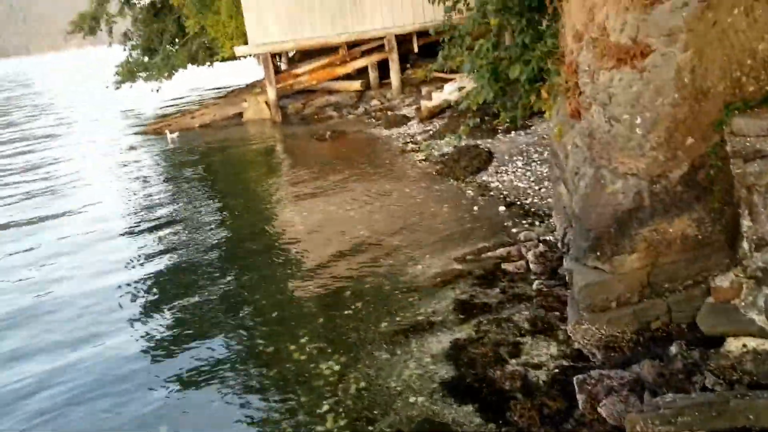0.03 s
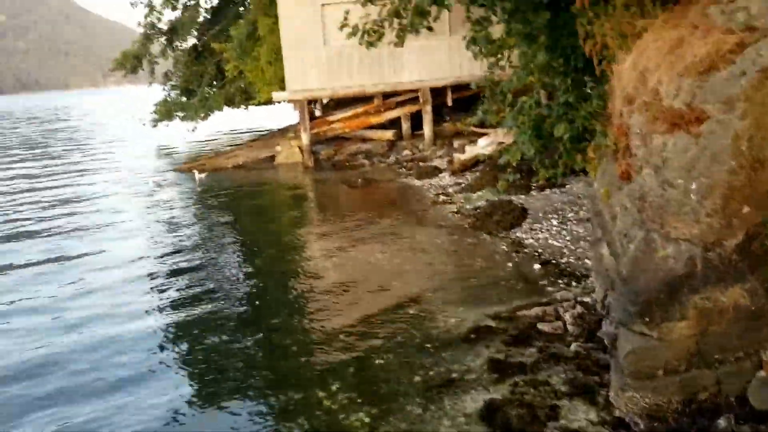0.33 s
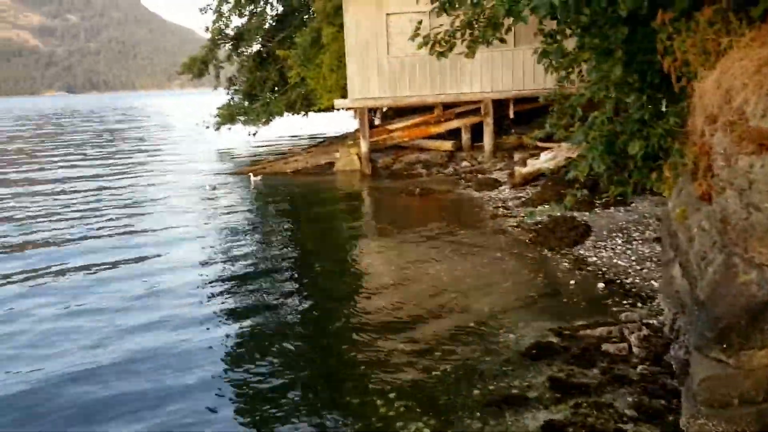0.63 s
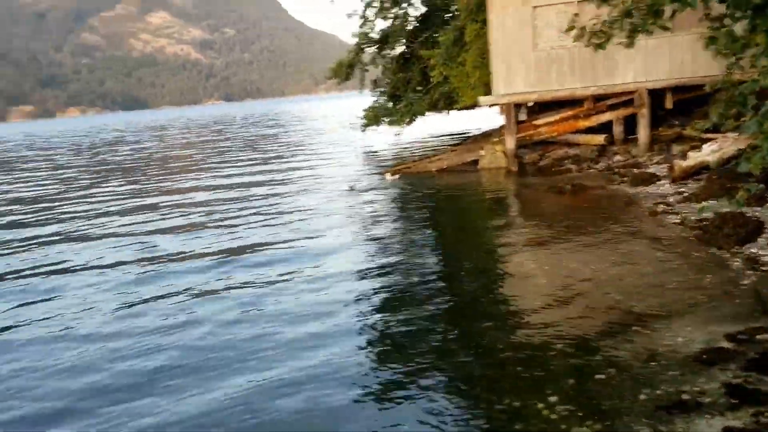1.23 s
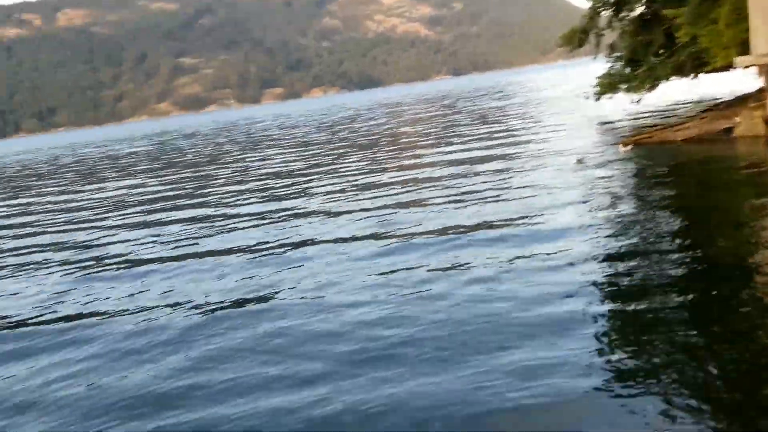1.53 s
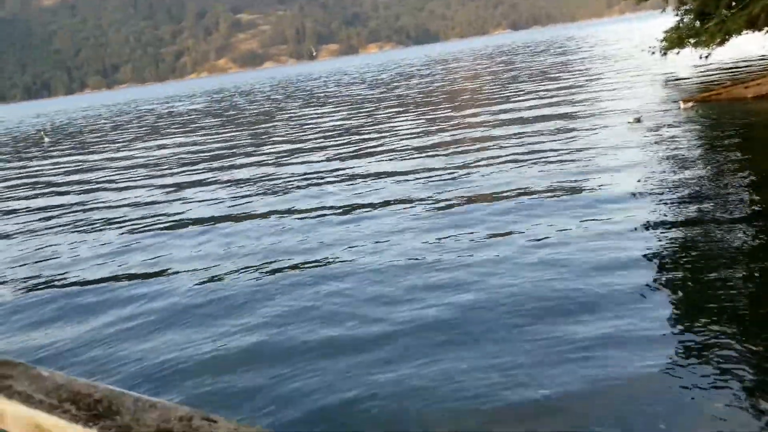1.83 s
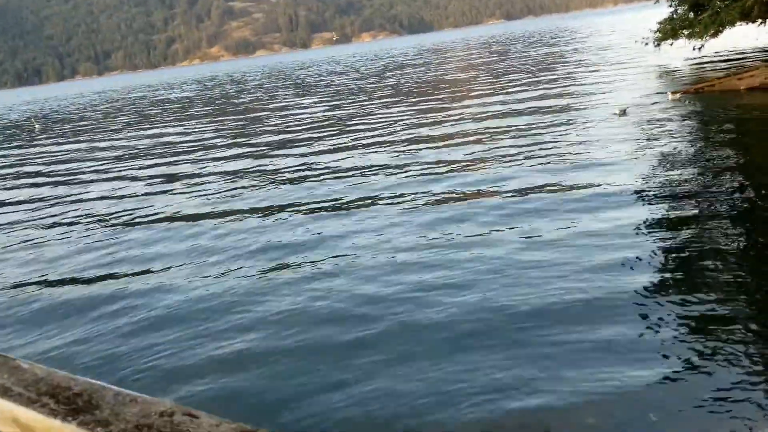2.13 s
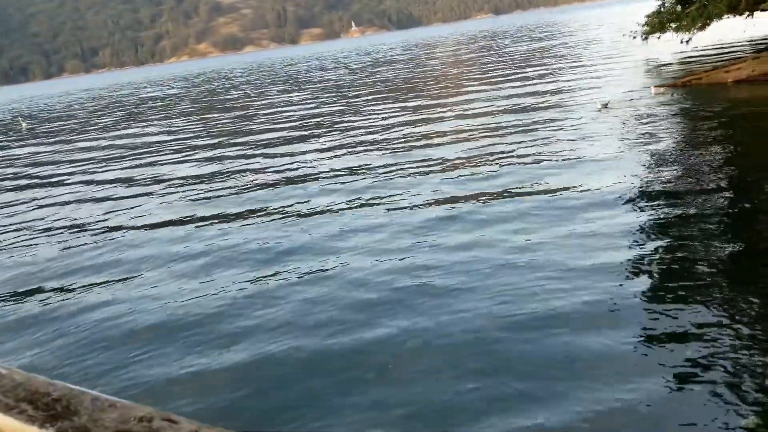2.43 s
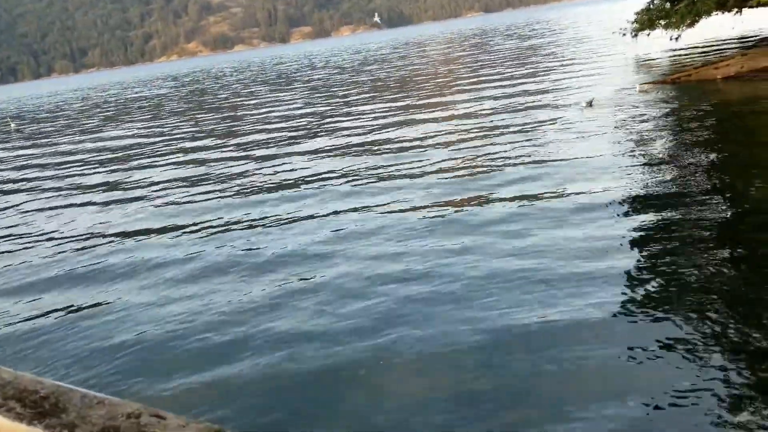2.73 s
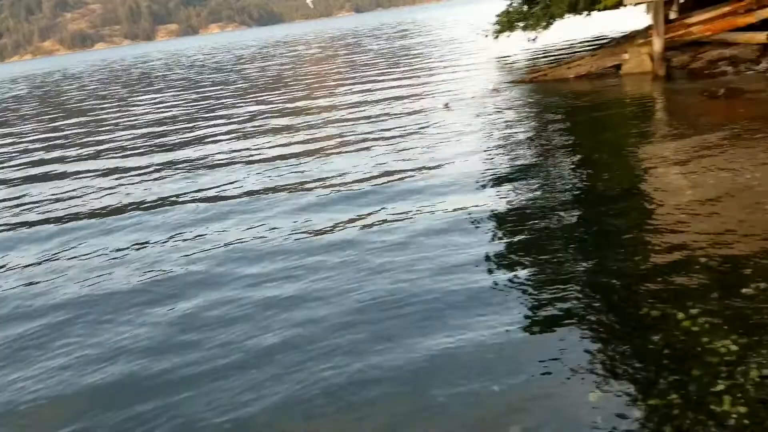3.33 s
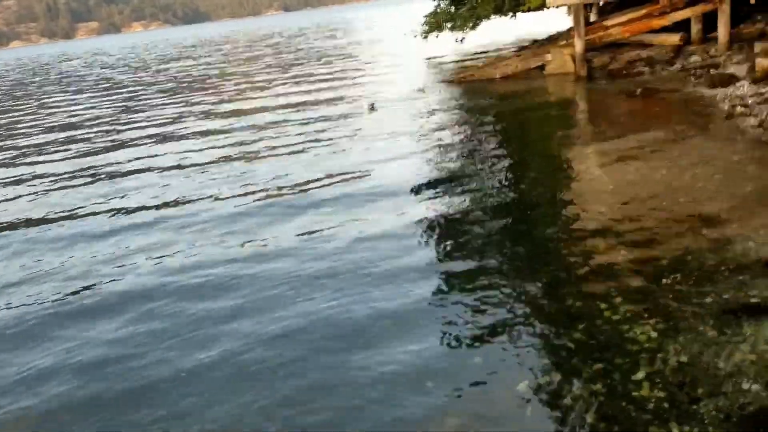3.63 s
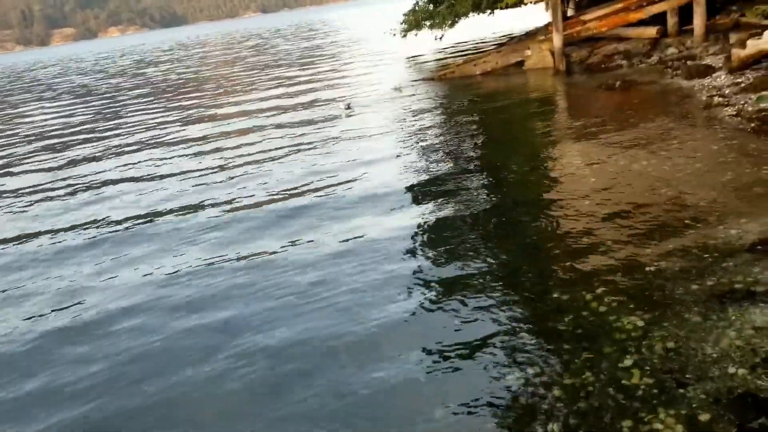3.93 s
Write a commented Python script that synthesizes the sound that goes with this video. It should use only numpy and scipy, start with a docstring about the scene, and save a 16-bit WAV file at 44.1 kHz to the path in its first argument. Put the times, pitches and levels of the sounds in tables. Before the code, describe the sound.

An animal barks hoarsely across a bay, slightly left, with a light echo: six quick barks in the first second, five from about 2 to 2.8 seconds, and three after 3.5 seconds. Sharp clicks like knocking pebbles sound close on the right, loudest at the start and at 3.3 seconds. Small waves softly lap, gurgle and hiss throughout. Wind brushes the microphone early and around 2 seconds.

```python
"""A sharp click close on the right, like pebbles knocking, and wind brushing the microphone.
An animal barks in quick bouts across a quiet bay: each bark is an arched tone plus a rasp of pulses
and puffs through throat resonances, and the rocky shore throws it back. More clicks follow.
Small waves lap, splash and hiss at the water's edge; ringing air pockets gulp and gurgle."""
import sys
import numpy as np
from scipy import signal
from scipy.fft import rfft, irfft
from scipy.io import wavfile
from scipy.ndimage import uniform_filter1d

SR = 44100
rng = np.random.default_rng(int(sys.argv[2]) if len(sys.argv) > 2 else 0)


def wav_record(signal):
    """Record a signal, one row per channel, as 16-bit PCM in the file named by sys.argv[1]."""
    frames = np.transpose(np.atleast_2d(signal))
    bounded = np.clip(frames, -1, 1)
    # unit amplitude maps onto the largest positive 16-bit level
    quanta = np.round(bounded * 32767).astype(np.int16)
    wavfile.write(sys.argv[1], SR, quanta)


N = 176400
TIME_S = np.arange(N) / SR

# barks: (middle [s], pitch [Hz], tone [dB], octave [dB], rasp [dB], throat resonance [Hz],
# upper resonance [dB], length [ratio], lock [0-1]); lock trades mid-bark rasp for clear tone
BARKS = [(.018, 818.5, -49.5, -49.5, -55.5, 1370, -66, 0.97, 0),
         (.295, 837, -54.5, -54, -55.5, 1450, -68, 0.75, 0),
         (0.396, 829, -45, -40.5, -44, 1275, -45, 0.96, 0),
         (.555, 872.3, -39.5, -34, -42, 1290, -49.5, 0.89, 0.8),
         (.713, 874.6, -39.5, -35.5, -41.5, 1335, -52, .88, 0.57),
         (.884, 859, -43, -40.5, -42, 1235, -46, 0.89, 0.2),
         (2.055, 857, -39, -37.5, -41, 1500, -42.5, 0.82, 0.16),
         (2.225, 870, -36, -36.5, -40, 1300, -48.5, 0.92, 0.56),
         (2.391, 869.5, -36.5, -35, -45, 1270, -48.5, 0.96, 0.2),
         (2.563, 868, -38, -37, -43, 1345, -50, 0.945, 0.25),
         (2.735, 851.3, -41, -41, -44, 1480, -44, 0.87, 0.03),
         (3.561, 843.6, -42, -47, -41, 1466, -50, 0.87, 0.33),
         (3.73, 876.7, -40, -35, -44, 1320, -52.5, 0.97, 0.22),
         (3.929, 871, -39.5, -40, -44.5, 1320, -47.5, .97, 0.15)]
# bearing of the animal: (time [s], left minus right [dB])
BARK_PAN = [(.5, 2.5), (2.3, 4), (4, 2.5)]
# phase between microphone ports: (frequency [Hz], left lead [rad])
PORT_PHASE = [(860, 0.34), (1300, 0.82), (1750, 2.1), (2400, 1)]
# rock echoes: (delay [s], level [dB])
ECHOES = [(.012, -17), (.045, -19), (.098, -20)]
# shore reflection filter: (frequency [Hz], gain [dB])
SHORE_EQ = [(300, -13), (850, -5), (1300, -10), (1750, -0.5), (2300, -19), (5000, -15)]
# hard contacts: (time [s], level [dB], left minus right [dB], treble tilt [dB/octave])
CLICKS = [(0.034, -14.5, -24, -1.5), (0.1769, -22.5, -16, -7), (0.6492, -21.5, -23, -6.5),
          (0.9373, -21, -42, -1), (0.9623, -31.5, -21, 0), (1.112, -28.5, -20, -1),
          (2.5195, -22.5, -3, -6.5), (3.1396, -19, -14, -6), (3.307, -7, -9.5, 0.5),
          (3.6456, -29, -7, -2.5)]
# contact spectrum: (frequency [Hz], relative level [dB])
CLICK_SPECTRUM = [(200, -20), (1000, -16.5), (1700, -10), (3300, -8.5), (4600, -2.5), (6000, -2),
                  (7300, 0.5), (8300, -12), (10000, -15.5), (13000, -1.5), (15000, -7)]
# air pockets: (time [s], level [dB], start pitch [Hz], T60 [s])
BUBBLES = [(1.459, -37, 177, .052), (1.468, -41, 129.8, 0.46), (1.525, -38, 129.5, 0.24),
           (1.605, -43.5, 582, 0.12), (2.302, -49.5, 1156, .06), (2.521, -43.5, 175, 0.16),
           (2.913, -37, 760, 0.012), (2.945, -46, 386, 0.1), (3.656, -36, 772, 0.073)]
# sloshes, splashes, gritty scuffs: (time [s], level [dB], centre [Hz], length [s])
SPLASHES = [(0.187, -48.5, 4430, 0.031), (0.359, -50, 5930, .022), (0.766, -44.5, 2070, 0.02),
            (0.929, -51, 1200, 0.032), (1.15, -56.5, 484, .022), (1.202, -57.5, 5050, 0.048),
            (1.368, -47.5, 1530, .013), (1.448, -46, 416, 0.039), (1.453, -49, 220, 0.13),
            (1.601, -51, 700, 0.062), (2.342, -54, 6500, .024), (2.467, -46.5, 347, 0.011),
            (2.519, -51.5, 167, 0.056), (2.577, -53.5, 11000, 0.014), (2.771, -43.5, 6700, 0.011),
            (2.772, -52.5, 1920, 0.063), (2.906, -53.5, 880, 0.031), (2.988, -49.5, 660, 0.039),
            (3.225, -50, 1110, 0.018), (3.699, -50, 3570, 0.022)]
# droplets falling back from the waves: (time [s], level [dB], centre [Hz])
DROPS = [(.986, -56, 6900), (1.186, -56, 4240), (1.674, -54, 4340), (2.982, -56, 5560), (3.46, -54, 4700),
         (3.81, -54, 4300)]
# lapping spectrum: (frequency [Hz], relative level [dB])
LAP_SPECTRUM = [(25, -35), (55, 6.5), (300, 1.5), (600, 10.5), (1700, 3.5), (3000, -1), (8000, -28)]
# lapping envelope: (time [s], relative level [dB])
LAP_ENVELOPE = [(0, -53), (.3, -52), (.6, -64), (.95, -57.5), (1.1, -63.5), (1.4, -61.5), (1.7, -57),
                (1.9, -73), (2.3, -62.5), (2.65, -60), (2.95, -54), (3.12, -60.5), (3.4, -63.5),
                (3.65, -54), (4, -66)]
# water hiss spectrum: (frequency [Hz], relative level [dB])
HISS_SPECTRUM = [(900, 2.5), (2000, 8.5), (3200, 0), (7300, 2.5), (9000, -7), (10500, -5), (13000, 4),
                 (15000, -7)]
# water hiss envelope: (time [s], relative level [dB])
HISS_ENVELOPE = [(0, -60.5), (.22, -60), (.45, -65.5), (1.05, -68), (1.2, -67), (1.46, -67), (1.56, -60),
                 (1.82, -71), (2.05, -65.5), (2.35, -62), (2.65, -67), (2.8, -61), (3.2, -67.5),
                 (3.36, -62.5), (4, -67)]
# wind rumble spectrum: (frequency [Hz], relative level [dB])
WIND_SPECTRUM = [(25, -46), (48, 3), (75, 2), (130, -10.5), (250, -14), (2000, -40)]
# wind puffs: (time [s], level [dB])
WIND_ENVELOPE = [(0, -62), (.12, -49.5), (.33, -49.5), (.5, -56.5), (.76, -69.5), (.98, -60), (1.12, -74.5),
                 (2.03, -73.5), (2.065, -51), (2.18, -73.5), (3.25, -73), (3.47, -62), (3.62, -71)]

TONE_RISE_S, TONE_FALL_S, RASP_RISE_S, RASP_FALL_S = .025, .03, .034, .035  # half-widths at length 1
ARCH_S, ROUGH_S = .03437, .028  # likewise
ARCH, DROOP, LOCK_DROOP, JITTER = .11, .07, .203, .008  # shares of pitch
LOCK_STRETCH, THROAT_SAG_RATIO, SUBDIVISION = .22, .25, 5
ROUGH_MIDDLE, ROUGH_ENDS, RIPPLE_SCATTER = .18, .85, .12  # noise shares of power
THROAT_WIDTH_HZ, UPPER_HZ, UPPER_WIDTH_HZ = 260, 2016, 165
CHEST_HZ, CHEST_WIDTH_HZ, CHEST_DB = 840, 434, -8.5
OCTAVE_LAG_S, OCTAVE_POWER, THIRD_DB = .00067, 1.8, -22
SHIMMER_DB, FRAY_RAD, RASP_FLUTTER_DB = 1, .3, 2.5
SHORE_T60_S, SHORE_DB = .34, -7.5
FIRST_TOUCH_GAIN, REBOUND_S, CLICK_TAIL_DB, CLICK_T60_S = .75, .0007, -16, .04
BUBBLE_RISE_PER_S, BUBBLE_ATTACK_S, DROP_DECAY_S, DROP_WIDTH_RATIO = .75, .0052, .0053, .13
LAP_DB, WATER_PAN_DB, GURGLES_PER_S, GURGLE_DB = 1, 3.5, 100, .5
HISS_DB, HISS_PAN_DB, HISS_SWELL_DB, SPRAY_PER_S, SPRAY_DB = 6.5, -3, 1.3, 110, 13
CUTOFF_HZ = 14750


def bark(middle_s, pitch_hz, tone_db, octave_db, rasp_db, throat_hz, upper_db, length, lock):
    """A hoarse onset clears into an arched tone, then frays; a five-cycle pulse pattern adds rasp."""
    t = np.arange(-4096, 4096) / SR
    before = t < 0
    tone_t = t / length
    rasp_t = tone_t / (1 + LOCK_STRETCH * lock)
    rough = ROUGH_ENDS + (ROUGH_MIDDLE - ROUGH_ENDS) * np.exp(-(rasp_t / ROUGH_S) ** 2)
    off_middle = (tone_t / ARCH_S) ** 2
    sag = np.where(before, ARCH, DROOP + LOCK_DROOP * lock) * (1 - np.exp(-off_middle))
    jitter = JITTER * wander(len(t), rate_hz=136) * (1 + np.minimum(off_middle, 2))
    cycles = np.cumsum(pitch_hz * (1 - sag + jitter)) / SR

    tone_env = np.exp(-abs(tone_t / np.where(before, TONE_RISE_S, TONE_FALL_S)) ** 2.2)
    octave_env = np.interp(t - OCTAVE_LAG_S, t, tone_env) ** OCTAVE_POWER
    rasp_env = np.exp(-abs(rasp_t / np.where(before, RASP_RISE_S, RASP_FALL_S)) ** np.where(before, 3, 4))
    rasp_env *= amp(RASP_FLUTTER_DB * wander(len(t), rate_hz=50))

    sub_rad = 2 * np.pi * cycles / SUBDIVISION
    orders = [k for k in range(2, 18) if k % SUBDIVISION]
    pulses = unit(sum(np.cos(k * sub_rad + rng.standard_normal()) for k in orders))
    puffs = unit((2 + np.cos(sub_rad)) * rng.standard_normal(len(t)))

    def throat(hz, width_hz):
        """Pulses and puffs in a resonance that sags with pitch; ripples scatter some to each ear."""
        hz = hz * (1 - THROAT_SAG_RATIO * sag)
        voice = np.sqrt(1 - rough) * resonate(pulses, hz, width_hz)
        voice += np.sqrt(rough) * resonate(puffs, hz, width_hz)
        scatter = resonate(rng.standard_normal((2, len(t))), hz, width_hz)
        return np.sqrt(1 - RIPPLE_SCATTER) * voice + np.sqrt(RIPPLE_SCATTER) * scatter

    rasp = throat(throat_hz, THROAT_WIDTH_HZ) + amp(CHEST_DB) * throat(CHEST_HZ, CHEST_WIDTH_HZ)
    rasp *= amp(rasp_db) * rasp_env * (1 - lock * tone_env)
    rasp += amp(upper_db) * np.sqrt(tone_env * rasp_env) * throat(UPPER_HZ, UPPER_WIDTH_HZ)
    octave = amp(octave_db) * octave_env
    tone = np.zeros(len(t))
    for k, level in enumerate([amp(tone_db) * tone_env, octave, amp(THIRD_DB) * octave], 1):
        shimmer = amp(SHIMMER_DB * wander(len(t), rate_hz=68))
        fray_rad = FRAY_RAD * rough * wander(len(t), rate_hz=102)
        tone += np.sqrt(2) * level * shimmer * np.sin(2 * np.pi * k * cycles + fray_rad)
    return middle_s + t[0], (tone + rasp) * pan(at_time(BARK_PAN, middle_s))


def mic_ports(x):
    """Two ports hear the barks nearly in step low down, out of step higher up."""
    lead_rad = at_hz(PORT_PHASE, bins_hz(N))
    return irfft(rfft(x) * np.exp(.5j * lead_rad * np.array([[1], [-1]])), N)


def shore(x):
    """Smeared rock echoes and a thin diffuse tail."""
    t = np.arange(SR) / SR
    response = rng.standard_normal((2, SR)) * amp(-60 * t / SHORE_T60_S) * (t > .004)
    response *= amp(SHORE_DB) / np.linalg.norm(response[0])
    for delay_s, db in ECHOES:
        smear = rng.standard_normal((2, SR)) * np.exp(-t / .025)
        add(response, delay_s, smear * amp(db) / np.linalg.norm(smear[0]))
    return signal.fftconvolve(x, colour(response, SHORE_EQ), axes=1)[:, :N]


def click(time_s, db, pan_db, tilt_db_per_octave):
    """A hard contact, its rebound and a brief scatter of reflections."""
    n = 4096
    t, hz = np.arange(n) / SR, bins_hz(n)
    tilt_db = tilt_db_per_octave * np.log2(np.maximum(hz, 3800) / 5500)
    log_gain = np.log(amp(at_hz(CLICK_SPECTRUM, hz) + tilt_db))
    min_phase = np.exp(np.conj(signal.hilbert(np.r_[log_gain, log_gain[-2:0:-1]])))[:len(hz)]
    touch = FIRST_TOUCH_GAIN * np.exp(-2j * np.pi * hz * .000439)
    rebound = np.exp(-2j * np.pi * hz * (.0004 + REBOUND_S))
    strike = irfft(min_phase * (touch - rebound))
    direct = np.array([np.roll(strike, -5), strike]) / abs(strike).max()  # left leads by 5 samples
    dulling = amp(-2.5 * np.log2(np.maximum(hz, 1000) / 5500))
    scatter = unit(irfft(min_phase * dulling * rfft(rng.standard_normal((2, n)))))
    tail = amp(CLICK_TAIL_DB - 60 * t / CLICK_T60_S) * np.minimum(t / .000057, 1) * scatter
    return time_s, amp(db) * (1.15 * direct * pan(pan_db) + .8 * tail * pan(.22 * pan_db))


def bubble(time_s, db, hz, t60_s):
    """An air pocket rings, rising in pitch as it nears the surface."""
    t = np.arange(SR // 4) / SR
    ring = np.sin(2 * np.pi * hz * (t + BUBBLE_RISE_PER_S * t ** 2 / 2))
    attack = np.minimum(t / BUBBLE_ATTACK_S, 1)
    decay = amp(-60 * np.maximum(t - BUBBLE_ATTACK_S, 0) / t60_s)
    return time_s, amp(db) * attack * decay * ring * pan(WATER_PAN_DB * min(hz / 600, 1))


def splash(time_s, db, hz, length_s):
    """A grainy noise burst; mid-pitched ones come from the water on the left."""
    t = np.arange(SR // 4) / SR
    grains = unit(rng.standard_normal((3, len(t))) * amp(3 * rng.standard_normal(len(t))))
    grit = grains[2] + grains[:2] * hz / 1500  # wider stereo when higher
    envelope = amp(db) * np.minimum(t * hz / 2, 1) * np.exp(-(t / length_s) ** 2)
    return time_s, envelope * band(grit, hz, .72 * hz) * pan(WATER_PAN_DB * (200 < hz < 1200))


def drop(time_s, db, hz):
    """A droplet lands with a tiny pitched tick."""
    t = np.arange(SR // 16) / SR
    tick = band(rng.standard_normal(len(t)), hz, DROP_WIDTH_RATIO * hz)
    return time_s, amp(db) * np.exp(-t / DROP_DECAY_S) * tick * pan(HISS_PAN_DB)


def lapping():
    """Wash of small waves; random gurgles follow its level."""
    lap_db = at_time(LAP_ENVELOPE, TIME_S)
    wash = noise(LAP_SPECTRUM, coherence=.49, patchy_db=4.5) * amp(LAP_DB + lap_db) * pan(WATER_PAN_DB)
    for when, pitch, strength, ring in rng.random((round(GURGLES_PER_S * N / SR), 4)):
        start = int(when * N)
        db = lap_db[start] + GURGLE_DB + 16 * (strength ** 2 - .5) - 4 * pitch
        add(wash, *bubble(start / SR, db, hz=350 * 7 ** pitch, t60_s=.0074 + .061 * ring))
    return wash


def spray():
    """Fine water hiss with random ticks of spray."""
    hits = rng.random((2, N)) < SPRAY_PER_S / SR
    ticks = hits * amp(SPRAY_DB + 1.44 * np.minimum(rng.exponential(1, (2, N)), 4))
    hiss = noise(HISS_SPECTRUM, coherence=.05, patchy_db=1.1) + colour(ticks, HISS_SPECTRUM)
    level_db = HISS_DB + at_time(HISS_ENVELOPE, TIME_S) + HISS_SWELL_DB * wander(N, rate_hz=30)
    return hiss * amp(level_db) * pan(HISS_PAN_DB)


def wind():
    """Low puffs on the microphone."""
    return noise(WIND_SPECTRUM, coherence=.94, patchy_db=1.5) * amp(at_time(WIND_ENVELOPE, TIME_S))


def noise(spectrum, coherence, patchy_db):
    """Shaped stereo noise with patches that come and go, rms 1."""
    white = rng.standard_normal((3, N))
    stereo = np.sqrt(coherence) * white[2] + np.sqrt(1 - coherence) * white[:2]
    frames = signal.stft(stereo, nperseg=512)[2]
    patches = uniform_filter1d(rng.standard_normal(frames.shape[1:]), size=5, axis=0)
    patches = unit(uniform_filter1d(patches, size=6, axis=1))
    patchy = signal.istft(frames * amp(patchy_db * np.minimum(patches, 2)), nperseg=512)[1]
    return unit(colour(patchy[:, :N], spectrum))


def resonate(x, hz, width_hz):
    """Resonance tracking the curve hz, rms 1."""
    carrier = np.exp(2j * np.pi * np.cumsum(hz) / SR)
    lowpass = signal.butter(2, width_hz / 2, fs=SR, output="sos")
    return unit((carrier * signal.sosfilt(lowpass, x / carrier)).real)


def band(x, hz, width_hz):
    """Steep-sided resonance, rms 1."""
    n = x.shape[-1]
    return unit(irfft(rfft(x) / (1 + 2j * (bins_hz(n) - hz) / (1.26 * width_hz)) ** 2, n))


def colour(x, spectrum):
    """Filter by (frequency [Hz], gain [dB])."""
    n = x.shape[-1]
    return irfft(rfft(x) * amp(at_hz(spectrum, bins_hz(n))), n)


def wander(n, rate_hz):
    """Smooth random drift, rms 1."""
    return unit(irfft(rfft(rng.standard_normal(n)) / (1 + (bins_hz(n) / rate_hz) ** 4), n))


def bins_hz(n):
    return np.fft.rfftfreq(n, 1 / SR)


def at_hz(table, hz):
    knots_hz, values = np.transpose(table)
    return np.interp(np.log(hz + 1), np.log(knots_hz), values)


def at_time(table, time_s):
    return np.interp(time_s, *np.transpose(table))


def amp(db):
    return 10 ** (np.asarray(db) / 20)


def unit(x):
    return x / np.sqrt(np.mean(x ** 2) + 1e-20)


def pan(db):
    """Constant-power gains; positive is left."""
    return unit(amp([[db / 2], [-db / 2]]))


def add(mix, time_s, sound):
    start = round(time_s * SR)
    sound = sound[:, max(-start, 0):]
    part = mix[:, max(start, 0):][:, :sound.shape[1]]
    part += sound[:, :part.shape[1]]


def play(source, table):
    """Mix one sound per row."""
    mix = np.zeros((2, N))
    for row in table:
        add(mix, *source(*row))
    return mix


def scene():
    """Barks and echoes across the bay; clicks, water and wind close by."""
    barks = play(bark, BARKS)
    far = mic_ports(barks) + shore(barks)
    clicks = play(click, CLICKS)
    water = play(splash, SPLASHES) + play(drop, DROPS) + play(bubble, BUBBLES) + lapping() + spray()
    return far + clicks + water + wind()


def record(dry):
    """Steep low-pass at CUTOFF_HZ."""
    lowpass = signal.firwin(255, CUTOFF_HZ, window=("kaiser", 8), fs=SR)
    return signal.oaconvolve(dry, lowpass[None], "same")


dry = scene()
out = record(dry)
wav_record(out)
```